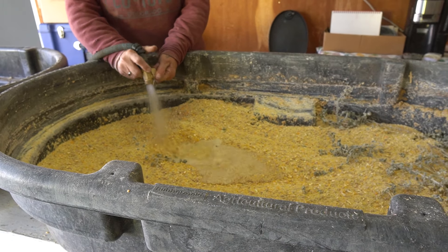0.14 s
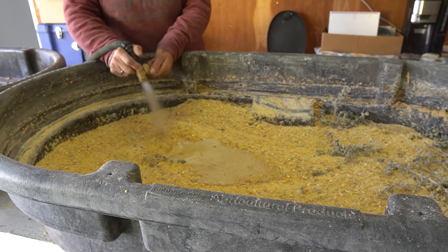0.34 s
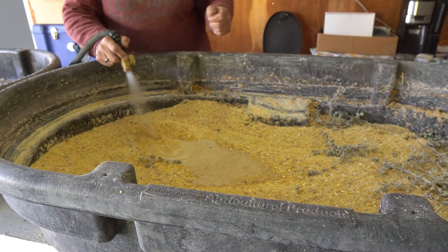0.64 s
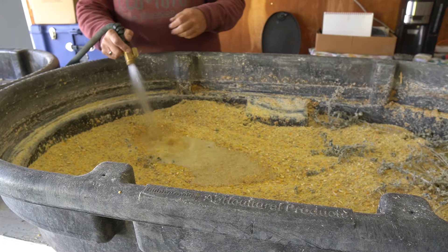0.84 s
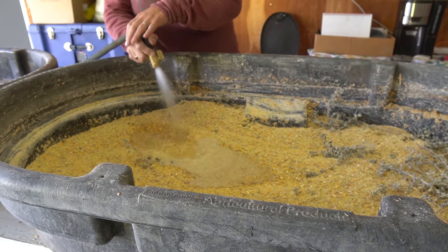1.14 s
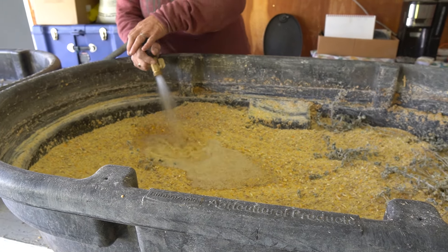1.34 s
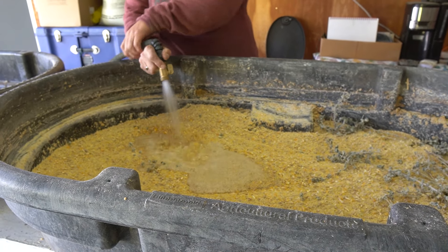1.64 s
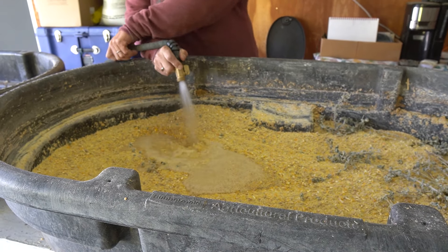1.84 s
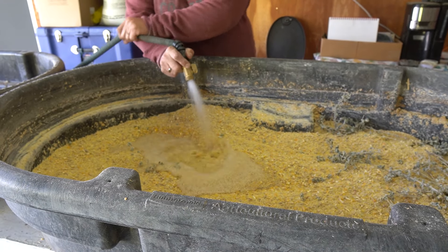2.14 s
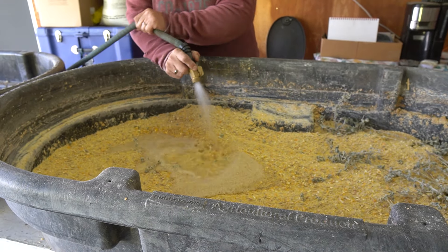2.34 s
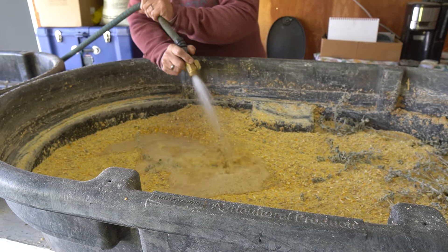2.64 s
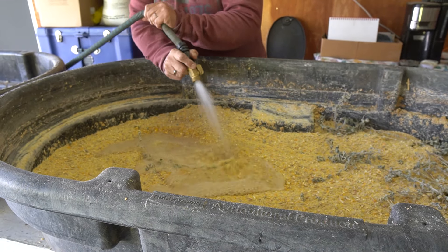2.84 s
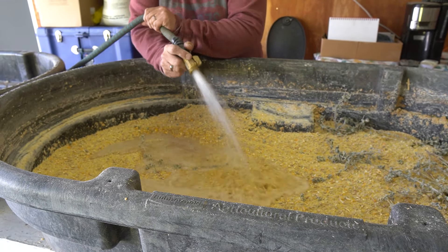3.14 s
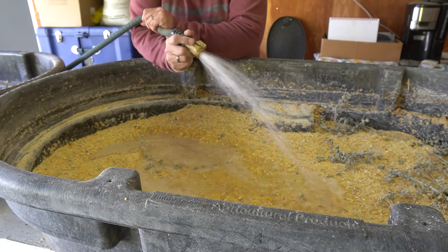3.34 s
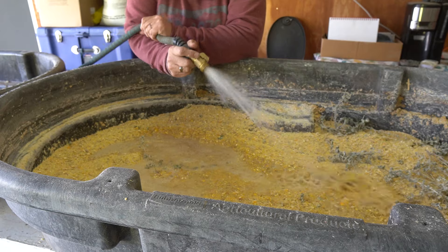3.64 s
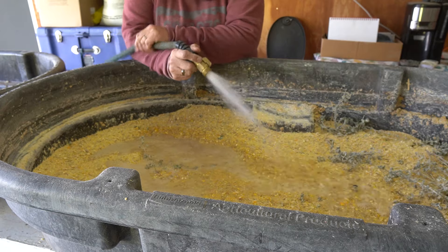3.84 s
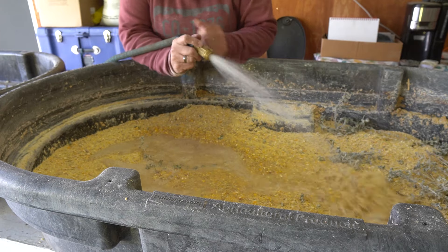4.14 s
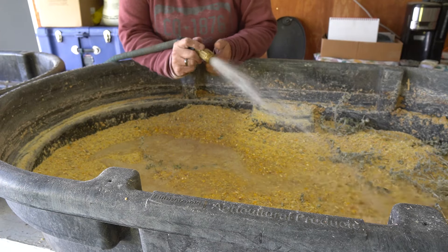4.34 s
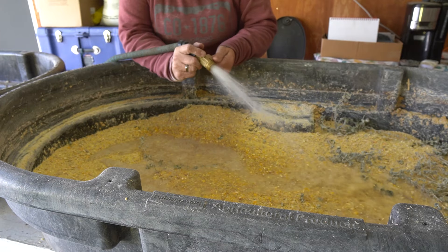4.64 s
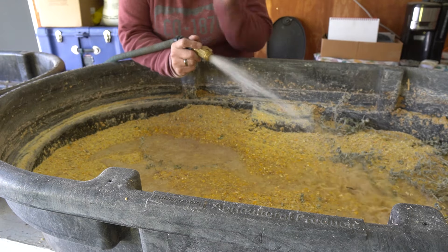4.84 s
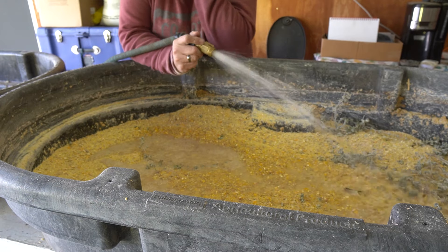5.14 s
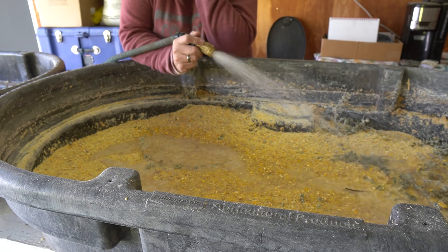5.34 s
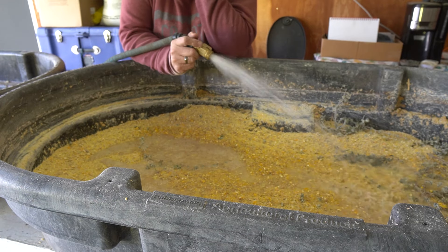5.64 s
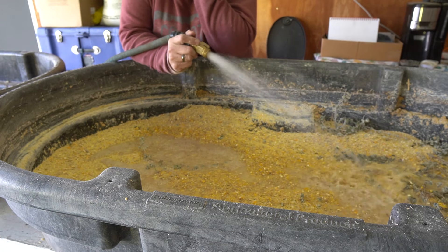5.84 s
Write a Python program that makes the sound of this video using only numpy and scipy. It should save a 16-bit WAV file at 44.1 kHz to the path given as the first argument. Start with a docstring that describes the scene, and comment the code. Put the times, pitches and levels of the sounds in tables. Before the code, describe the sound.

A hose jet sprays soaked grain in a plastic tank, a crisp gritty hiss with two loud crackling swells and faint bubbling.

```python
"""Water spray on grain in a plastic tank

Drops patter on dry grain (random clicks through a filter) and ring a pit in it; wet grain splashes and fine mist fizzes.
Bubbles gurgle, froth and plink as decaying notes; spray slaps the wall and the tank drums and booms (noise in resonances).
Fat drops snap on the plastic; low bubble glugs and dull knocks on the tank sound as damped rings.
Sliding wall echoes and thinned bands colour the drops as the aim moves; a faint room tail surrounds all.
"""
import sys
import numpy as np
from scipy import signal
from scipy.io import wavfile
from scipy.ndimage import map_coordinates

SR = 44100
rng = np.random.default_rng(int(sys.argv[2]) if len(sys.argv) > 2 else 0)


def dump_mix(stems):
    """Bounce the given channels to the path in sys.argv[1] as a 16-bit WAV at rate SR."""
    frames = np.atleast_2d(stems).T  # one column per channel
    limited = np.clip(frames, -1, 1)  # hard clip at full scale
    pcm = np.round(limited * 32767).astype(np.int16)
    wavfile.write(sys.argv[1], SR, pcm)


N = 263277
TIME = np.arange(N) / SR

# Levels are relative: the sources add offsets. Pan is left over right. Colours are spectrum shapes.
# Drops on the grain. Each row: time in seconds, level in dB, pan in dB.
PATTER_CURVE = [(0.0, -42, -11), (0.36, -44, -7), (0.55, -40.5, -11.5), (0.74, -38, -12),
                (0.825, -31.5, -11), (0.87, -35.5, -15), (0.99, -33, -14), (1.02, -35, -13),
                (1.1, -43.5, -2.5), (1.66, -44.5, 1), (1.75, -47.5, 1), (2.44, -46.5, -5),
                (2.58, -43, -4.5), (2.94, -45.5, -7), (3.2, -42.5, -9), (3.44, -40.5, -14.5),
                (4.17, -39.5, -11.0), (4.29, -39, -14), (4.48, -36.5, -15), (4.62, -35.5, -11),
                (4.76, -37.5, -11.5), (5.05, -43.5, -14), (5.97, -42.5, -8.5)]
# Spectrum of the patter. Each row: frequency in Hz, relative density in dB.
PATTER_COLOUR = [(300, -70.5), (1200, -13.5), (2300, -13), (2850, -6.5), (3200, -4.5), (3500, -5),
                 (4000, -2.5), (4480, -2.5), (5000, -4.5), (5600, -7.5), (6800, -15), (8500, -19),
                 (12000, -30), (16000, -86)]
# Ring of the pit that the jet digs. Each row: time in seconds, centre in Hz.
PIT_CURVE = [(0, 4440), (.7, 4440), (1.0, 4640), (1.7, 4700), (1.91, 4250), (2.17, 4800), (2.59, 4200),
             (2.94, 4370), (3.57, 4450), (4.6, 4150), (5.05, 4120), (5.97, 4100)]
# The jet dwells on one spot and the pit rings more. Each row: start in seconds, end in seconds, extra gain.
PIT_DWELLS = [(.65, 0.716, 0.56), (2.55, 2.6, 0.27), (3.415, 3.64, 0.82), (4.26, 4.36, 0.2),
              (4.575, 4.64, 0.3)]
# The jet plays on the puddle and spatters more. One row: start in seconds, end in seconds, extra depth (0-1).
PUDDLE_SPELL = (1.1, 2.7, 0.06)
# The jet bites into the grain or skips for a moment. Each row: start in seconds, end in seconds, extra in dB.
GUSHES = [(.07, .09, 3), (0.673, 0.704, 0.5), (0.8, 0.829, 2.5), (1.01, 1.017, -3), (1.427, 1.444, 2),
          (1.87, 1.89, -2.5), (1.91, 1.925, 2), (2.558, 2.6, 2.5), (3.72, 3.745, 2), (4.15, 4.17, -3.5),
          (4.265, 4.315, 1), (4.35, 4.373, 0.5), (4.6, 4.645, 1.5), (5.257, 5.28, -0.5), (5.697, 5.78, 1)]
# The jet crosses wet grain and plastic. Each row: start in seconds, end in seconds, level in dB,
# rise in seconds, fall in seconds.
SPLASHES = [(0.03, 0.1, -60, 0.074, 0.16), (0.785, 0.845, -43, 0.027, 0.14), (1.4, 1.55, -54.5, 0.62, 0.18),
            (2.55, 2.62, -57.5, 0.048, 0.14), (2.88, 3.1, -55, 0.27, 0.036), (2.3, 2.37, -57, 0.05, 0.033),
            (4.53, 4.61, -48.5, 0.26, 0.17), (5.07, 5.17, -54, 0.19, 0.21)]
# Spectrum of the splashes. Each row: frequency in Hz, relative density in dB.
SPLASH_COLOUR = [(60, -54), (200, -35.5), (480, -12.5), (680, -7.5), (950, -2.5), (1200, 0), (1650, 1.5),
                 (2100, 1), (2700, 3.5), (3600, -12), (7000, -36), (16000, -56)]
# Fine mist. Each row: time in seconds, level in dB, pan in dB.
MIST_CURVE = [(0.0, -56.5, -6), (0.3, -54, -5.5), (0.7, -49, -10), (0.8, -48, -6), (1.1, -50, -7.5),
              (1.44, -51, -7), (1.53, -54.5, -3), (1.91, -55, 5), (1.98, -53, 4), (2.25, -49, -2),
              (2.42, -51.5, -0.5), (2.97, -51, -2.5), (3.17, -46.5, -7), (3.51, -47.5, -10.5),
              (4.67, -44.5, -11.5), (4.83, -47.5, -9.5), (4.94, -50.5, -5), (5.07, -55, 6), (5.97, -55, 6)]
# Spectrum of the fizz. Each row: frequency in Hz, relative density in dB.
MIST_COLOUR = [(2000, -45.5), (4500, 6.5), (6000, 8.5), (7300, 5.5), (8500, -0.5), (10500, -2),
               (13000, -7.5), (15800, -26)]
# Spectrum of the finest mist. Each row: frequency in Hz, relative density in dB.
AIR_COLOUR = [(5000, -18.5), (9000, 9.5), (12000, 3), (14000, 1.5), (15800, -3)]
# Puffs of mist. Each row: start in seconds, end in seconds, extra in dB.
PUFFS = [(1.23, 1.243, 3), (3.125, 3.14, 0.5), (4.495, 4.508, 3.5), (4.889, 4.895, 5.5)]
# Small bubbles tinkle. Each row: start in seconds, end in seconds, level in dB.
TINKLES = [(1.218, 1.3, -48), (1.483, 1.677, -46.5), (2.566, 2.597, -46), (2.9, 3.08, -60)]
# Large bubbles in the puddle. Each row: start in seconds, end in seconds, centre pitch in Hz, level in dB.
GURGLES = [(1.28, 1.305, 305, -56.5), (1.43, 1.62, 1130, -59.5), (1.757, 1.863, 1210, -57),
           (2.57, 2.616, 980, -54), (2.918, 3.12, 1320, -61), (5.1, 5.903, 1260, -64)]
# Spray on the bare wall. Each row: start in seconds, end in seconds, level in dB.
SLAPS = [(0.337, 0.584, -60), (0.82, 0.816, -51.5), (5.092, 5.35, -61.5), (5.726, 5.866, -56.5)]
# Spectrum of the drumming. Each row: frequency in Hz, relative density in dB.
DRUM_COLOUR = [(20, -23), (45, -27), (70, -11), (110, -1), (170, -1), (250, -1), (340, 0.5), (430, -1),
               (540, -2), (700, -8), (1000, -11), (2500, -29.5)]
# The tank drums louder and more to the right as the aim moves along it.
DRUM_DB, DRUM_DB_PER_M = -58, 2.5
DRUM_PAN_DB, DRUM_PAN_DB_PER_M = -4.5, -8
# The tank floor under the jet. Each row: start in seconds, end in seconds, centre pitch in Hz, level in dB.
BOOMS = [(.1, 1.2, 381, -58), (1.55, 2.452, 415, -61), (2.7, 3.327, 170, -58), (3.896, 5.97, 329, -61.5),
         (4.2, 5.97, 181, -60)]
# Fat drops, crowding where the jet passes close to the wall. Each row: time in seconds, level in dB, ring in Hz.
FAT_DROPS = [(.6717, -21, 4370), (.6952, -14, 4390), (0.7605, -12, 4150), (.7663, -9.5, 4440),
             (0.781, -12.5, 5300), (0.786, -9, 4370), (0.796, -12, 4440), (0.804, -7, 4440),
             (.8076, -17, 4520), (0.813, -6.5, 4260), (.8203, -7, 4610), (.828, -8, 3600),
             (0.8368, -9, 4400), (0.8455, -12, 4240), (0.8553, -10, 4680), (0.864, -13, 5130),
             (0.8783, -6, 4550), (0.886, -9, 4600), (0.8956, -10, 4780), (0.9104, -13, 3920),
             (0.9234, -13, 4000), (0.9362, -9.5, 4390), (.9433, -10, 4800), (.9834, -13, 5900),
             (0.9892, -8.5, 4440), (0.9932, -8.5, 4700), (.9973, -13, 5370), (1.024, -13, 4500),
             (2.5576, -19, 4220), (2.5853, -21, 4940), (2.592, -21, 3880), (2.649, -22, 4350),
             (2.679, -21, 2680), (2.785, -24, 4000), (3.478, -16, 4300), (3.9831, -18, 4350),
             (4.1908, -17, 2850), (4.3115, -19, 4120), (4.346, -13, 4460), (4.3593, -10, 4280),
             (4.4017, -11.5, 3880), (4.4236, -13, 4350), (4.4687, -15, 4370), (4.5025, -10.5, 4010),
             (4.5273, -11.5, 4570), (4.5426, -16, 5000), (4.568, -13, 3920), (4.5953, -9, 4610),
             (4.601, -12, 4220), (4.6123, -9, 4650), (4.6176, -12, 4400), (4.627, -10, 4500),
             (4.6328, -16, 3930), (4.6384, -13, 4070), (4.6826, -15, 4300), (4.72, -15, 4610),
             (4.7832, -20, 3750), (4.893, -16.5, 3960), (4.9306, -20, 4000), (5.1092, -22, 3790),
             (5.2013, -19, 4180), (5.2622, -18, 4330), (5.2743, -20, 3880), (5.6738, -18, 4100)]
# Spectrum of the snaps. Each row: frequency in Hz, relative density in dB.
FAT_COLOUR = [(300, -45), (1300, -15), (2400, -12), (3200, -2), (4500, -10.5), (5600, -2), (7000, -16),
              (9000, -19), (16000, -77)]
# Single bubbles. Each row: time in seconds, level in dB, pitch in Hz.
PLINKS = [(1.083, -38, 4000), (1.283, -36, 4220), (1.289, -31, 3330), (1.434, -37, 3750),
          (1.558, -32, 4960), (1.683, -35, 4540), (1.905, -35, 4090), (2.586, -30, 3480),
          (2.986, -34, 4130), (3.053, -36, 2840), (3.365, -31, 3700)]
# Low bubble glugs (1.256-1.312 s) and dull knocks on the tank (the rest).
# Each row: time in seconds, level in dB, pitch in Hz.
GLUGS_AND_KNOCKS = [(1.256, -36, 345), (1.292, -35, 313), (1.312, -36, 390), (3.913, -22.5, 390),
                    (3.923, -29.5, 310), (5.938, -33, 218)]
# Partials of the glugs and knocks. Each row: multiple of the pitch, level in dB, T60 in seconds.
RING_MODES = [(.48, -13, .03), (.75, -12, .025), (1, 0, .022)]
# Where the jet lands. Each row: time in seconds, position along the tank in metres.
AIM_CURVE = [(0, 0.027), (.8, -0.133), (1.2, -0.038), (1.5, 0.062), (2.2, 0.092), (3.2, 0.346),
             (4.5, 0.587), (5.4, 0.675), (5.97, 0.6)]
# Paths off the walls to the left microphone. Each row: mean delay in seconds, level in dB.
WALL_PATHS = [(.00243, 0), (.0031, -6), (.0041, -8)]
WALL_DRIFT_S = .00006  # rms wander of the delays
# The jet passes a wall whose echo cancels one band. Each row: start in seconds, end in seconds,
# first centre in Hz, last centre in Hz, width in Hz, share cancelled (0-1, halved on the left).
WALL_PASSES = [(0, .6, 3800, 2800, 500, 0.44), (.6, .92, 2800, 2560, 450, 0.35),
               (1.08, 1.3, 2800, 3150, 450, 0.25), (2.008, 2.3, 4030, 3500, 700, 0.24),
               (.22, .6, 2070, 1950, 450, 0.24), (1.25, 1.31, 3850, 4050, 200, 0.7),
               (2.75, 3.15, 2030, 1960, 450, 0.6), (3.255, 4.098, 1640, 1830, 1300, 0.43),
               (4.1, 5.9, 900, 930, 280, 0.26), (5.145, 5.897, 2190, 2140, 450, 0.68)]
EDGE_HZ = 15850  # upper band limit


def gain_of(db):
    """Amplitude gain of a level in dB."""
    return 10 ** (np.asarray(db) / 20)


def evened(x):
    """Scales each channel to rms 1."""
    return x / np.sqrt(np.mean(x ** 2, axis=-1, keepdims=True) + 1e-20)


def decay(t, t60_s):
    """Exponential decay by 60 dB in t60_s."""
    return np.exp(-np.log(1000) * t / t60_s)


def follow(table):
    """Columns of a table of curves, at every sample."""
    s, *columns = np.transpose(table)
    return [np.interp(TIME, s, column) for column in columns]


def spell(start_s, end_s, rise_s, fall_s):
    """Gain that approaches 1 exponentially, holds from start to end, and dies away."""
    return np.exp(np.minimum(TIME - start_s, 0) / rise_s - np.maximum(TIME - end_s, 0) / fall_s)


def swelling(rest_db, spells):
    """Resting level in dB, with spells (start, end, dB, rise, fall) added in power."""
    power = gain_of(rest_db) ** 2
    for start_s, end_s, db, rise_s, fall_s in spells:
        power = power + (gain_of(db) * spell(start_s, end_s, rise_s, fall_s)) ** 2
    return 10 * np.log10(power)


def gushing(table, rise_s=0.019, fall_s=0.024):
    """Extra dB that gushes or puffs give to the drops."""
    return sum(db * spell(start_s, end_s, rise_s, fall_s) for start_s, end_s, db in table)


def flutter(slow_hz, fast_hz, count=60):
    """Random wavering of rms 1: sines of random phase, computed every 64 samples."""
    t = TIME[::64]
    waves = sum(np.sin(2 * np.pi * (hz * t + rng.random())) for hz in np.geomspace(slow_hz, fast_hz, count))
    return np.interp(TIME, t, evened(waves))


def placed(level_db, pan_db):
    """Left and right gains that share a level."""
    lean = gain_of(pan_db) * np.ones(N)
    return gain_of(level_db) * np.array([lean, np.ones(N)]) * 2 / np.sqrt(1 + lean ** 2)


def blend(a, b, share):
    """Mixes two unrelated sounds at constant power; share is the part of a."""
    share = np.clip(share, 0, 1)
    return np.sqrt(share) * a + np.sqrt(1 - share) * b


def coloured(x, colour, size=4096):
    """Minimum-phase filter of energy 1 with the given spectrum: clicks keep their sharp start."""
    hz, db = np.transpose(colour)
    bin_hz = abs(np.fft.fftfreq(size, 1 / SR))
    log_gain = np.log(gain_of(np.interp(np.log(bin_hz + 1), np.log(hz), db)))
    ring = np.fft.ifft(np.exp(np.conj(signal.hilbert(log_gain)))).real[:size // 2]
    return signal.oaconvolve(x, ring[None] / np.linalg.norm(ring), axes=1)[:, :N]


def resonate(x, hz, width_hz):
    """Resonance of gain 1 that follows the curve hz: shift to zero, one-pole low-pass, shift back."""
    turn = np.exp(2j * np.pi * np.cumsum(hz) / SR)
    r = np.exp(-np.pi * width_hz / SR)
    return 2 * (turn * signal.lfilter([1 - r], [1, -r], x / turn)).real


def delayed(x, delay_s):
    """Follows a path whose length changes."""
    return map_coordinates(x, [(TIME - delay_s) * SR], order=3)


def off_wall(x):
    """What reaches the shaded left microphone by way of the tank walls."""
    drift_s = WALL_DRIFT_S * flutter(.2, .8, count=6)
    paths = sum(gain_of(db) * delayed(x, lag_s + drift_s) for lag_s, db in WALL_PATHS)
    return paths / np.linalg.norm([gain_of(db) for _, db in WALL_PATHS])


def paired(x, likeness):
    """The left microphone hears part of the right one's sound off the walls."""
    return np.array([blend(off_wall(x[1]), x[0], likeness), x[1]])


def drops(per_s, spread_db, largest):
    """Two independent showers of random clicks of uneven size, one a channel."""
    chance, size, sign = rng.random((3, 2, N))
    size = np.minimum(-np.log(1 - size), largest)
    return evened((chance < per_s / SR) * gain_of(spread_db * size) * np.sign(sign - .5))


def grainy(clicks, share):
    """Separate drops over the wash of countless tiny ones; the shaded left microphone hears more wash."""
    return blend(clicks, rng.standard_normal((2, N)), share * np.array([[.6], [1]]))


def spray():
    """Drops patter on the grain and splash on the wet; the hard ones do both. Also returns the jet's clumping."""
    force = np.clip((follow(PATTER_CURVE)[0] + 41.0) / 12, 0, 1)
    hard, soft = (drops(per_s=1400, spread_db=4.6, largest=3.2) for _ in range(2))
    clumps = flutter(11, 130)  # the jet breaks up unevenly
    return patter(hard, force, clumps) + splash(hard, soft, force), clumps


def patter(hard, force, clumps):
    """Clicks on grain, coarser when harder, ring the pit whose shape keeps changing."""
    level_db, pan_db = follow(PATTER_CURVE)
    clicks = paired(grainy(hard, 0.55 + 0.46 * force), 0.04 + 0.28 * force)
    hits = spatter(coloured(clicks, PATTER_COLOUR))
    pit_hz = follow(PIT_CURVE)[0] + 85 * flutter(4, 25)
    pit_gain = 0.78
    for start_s, end_s, extra in PIT_DWELLS:
        pit_gain = pit_gain + extra * spell(start_s, end_s, rise_s=0.26, fall_s=0.22)
    hits = hits + pit_gain * resonate(hits, pit_hz, width_hz=420)
    return hits * placed(level_db - 1.77 + gushing(GUSHES) + 0.45 * clumps, pan_db)


def spatter(x, width_hz=380, count=7):
    """Small hollows open and close in wet grain, each lifting or dulling a band, most of all in the puddle."""
    start_s, end_s, extra = PUDDLE_SPELL
    depth = 0.18 + extra * spell(start_s, end_s, rise_s=0.06, fall_s=0.2)
    bands_hz = np.geomspace(2900, 5900, count)
    return x + sum(depth * flutter(8, 60) * resonate(x, np.full(N, hz), width_hz) for hz in bands_hz)


def splash(hard, soft, force):
    """Drops on wet grain and plastic: filtered clicks and wash that swell at each crossing."""
    clicks = grainy(blend(hard, soft, 0.18), 0.78 + 0.073 * force)
    wet = gain_of(swelling(rest_db=-57.0, spells=SPLASHES))
    waver_db = 0.78 * gushing(GUSHES) + 2.07 * flutter(14, 130)
    return coloured(paired(clicks, 0.042), SPLASH_COLOUR) * wet * placed(1.76 + waver_db, pan_db=-7.0)


def mist(clumps):
    """The finest drops fizz; their highest air is beamed, so it grows faster than the fizz."""
    level_db, pan_db = follow(MIST_CURVE)
    fizz = coloured(grainy(drops(per_s=3000, spread_db=5.5, largest=3.6), 0.33), MIST_COLOUR)
    air = coloured(grainy(drops(per_s=2500, spread_db=2.0, largest=1.7), 0.21), AIR_COLOUR)
    puffs_db = gushing(PUFFS) + 0.67 * gushing(GUSHES) + .5 * clumps + 1.65 * flutter(7.2, 130)
    air_db = -54.0 + 1.64 * (level_db + 48.5) + .5 * puffs_db + 1.0 * flutter(4.3, 130)
    return fizz * placed(level_db + 2.5 + puffs_db, pan_db) + air * placed(air_db, pan_db)


def bubbles(low_hz, high_hz, t60_s, rise_per_s, per_s, count=14):
    """Bubbles of many sizes, each a short note that rises as it nears the surface."""
    t, out = np.arange(SR // 25) / SR, np.zeros((2, N))
    for hz in np.geomspace(low_hz, high_hz, count):
        note = np.sin(2 * np.pi * hz * t * (1 + rise_per_s * t)) * decay(t, t60_s)
        out += signal.oaconvolve(drops(per_s, spread_db=4, largest=2.5), note[None], axes=1)[:, :N]
    return evened(out)


def froth():
    """Small bubbles fizz throughout and tinkle in spells."""
    small = bubbles(low_hz=3500, high_hz=5400, t60_s=0.02, rise_per_s=0.9, per_s=70)
    spells = [(start_s, end_s, db, 0.06, 0.12) for start_s, end_s, db in TINKLES]
    return small * placed(swelling(rest_db=-56.5, spells=spells), 0.6)


def gurgle(spread=0.11, rise_s=0.063, fall_s=0.041):
    """Clusters of large bubbles burble where the jet digs into the puddle, each round its own pitch."""
    large = 0
    for start_s, end_s, hz, db in GURGLES:
        cluster = bubbles(hz * (1 - spread), hz * (1 + spread), t60_s=0.039, rise_per_s=1.1, per_s=40, count=9)
        large = large + cluster * gain_of(db) * spell(start_s, end_s, rise_s, fall_s)
    return large * placed(0.55, -6.0)


def slap(hz, width_hz=260, rise_s=0.07, fall_s=0.039):
    """Drops that miss the grain sound the hollow wall: clicks through a double resonance."""
    taps = grainy(drops(per_s=640, spread_db=1.5, largest=7.0), 0.8)
    spells = [(start_s, end_s, db, rise_s, fall_s) for start_s, end_s, db in SLAPS]
    pitch_hz = np.full(N, hz)
    ring = evened(resonate(resonate(taps, pitch_hz, width_hz), pitch_hz, width_hz))
    return ring * placed(swelling(rest_db=-65.0, spells=spells), -15.5)


def pushes():
    """Coarse pressure of the jet on its bed of grain."""
    return paired(grainy(drops(per_s=500, spread_db=4.5, largest=2.9), 0.39), 0.26)


def drum():
    """The push of the jet shakes the tank through its bed of grain, as low filtered clicks."""
    aim_m = follow(AIM_CURVE)[0]
    gains = placed(DRUM_DB + DRUM_DB_PER_M * aim_m, DRUM_PAN_DB + DRUM_PAN_DB_PER_M * aim_m)
    return coloured(pushes(), DRUM_COLOUR) * gains


def boom(width_hz=85):
    """The floor resonates under the spot that is hit; its pitch wanders as the water shifts."""
    push, out = pushes(), 0
    for start_s, end_s, hz, db in BOOMS:
        pitch_hz = hz * (1 + 0.06 * flutter(5, 16))
        ring = evened(resonate(resonate(push, pitch_hz, width_hz), pitch_hz, width_hz))
        out = out + ring * gain_of(db) * spell(start_s, end_s, rise_s=0.19, fall_s=0.11)
    return out * placed(-2.5, DRUM_PAN_DB + DRUM_PAN_DB_PER_M * follow(AIM_CURVE)[0] + 3.0)


def fat_drops(snap_db=-2.0, ring_db=-4.0, ring_t60_s=.007):
    """Big drops snap against the plastic on the right, each with a brief ring at its own pitch."""
    clicks, rings, t = np.zeros((1, N)), np.zeros(N), np.arange(SR // 100) / SR
    fade = (1 - np.exp(-t / .0003)) * decay(t, ring_t60_s)
    for s, db, hz in FAT_DROPS:
        at = round(s * SR)
        clicks[0, at] = gain_of(db + snap_db)
        rings[at:at + len(t)] += gain_of(db + ring_db) * fade * np.sin(2 * np.pi * hz * t)
    snaps = coloured(clicks, FAT_COLOUR)[0] + rings
    return np.array([off_wall(snaps), snaps]) * placed(-2.0, -13.0)


def plinks(t60_s=0.057, swell_s=0.0023):
    """Single bubbles ring out as decaying sines, from the spot where the jet lands."""
    t, out = np.arange(SR // 12) / SR, np.zeros(N)
    fade = (1 - np.exp(-t / swell_s)) * decay(t, t60_s)
    for s, db, hz in PLINKS:
        at = round(s * SR)
        out[at:at + len(t)] += gain_of(db) * fade * np.sin(2 * np.pi * hz * t)
    return np.array([off_wall(out), out]) * placed(-2.5, follow(PATTER_CURVE)[1])


def glugs_and_knocks(onset_s=0.0027):
    """Low bubble glugs and dull knocks on the tank: soft-edged damped rings, each at its own pitch, high-passed."""
    t, out = np.arange(SR // 8) / SR, np.zeros(N + SR)
    for s, db, hz in GLUGS_AND_KNOCKS:
        ring = sum(gain_of(mode_db) * decay(t, t60_s) * np.sin(2 * np.pi * ratio * hz * t)
                   for ratio, mode_db, t60_s in RING_MODES)
        at = round(s * SR)
        out[at:at + len(t)] += gain_of(db) * ring * (1 - np.exp(-(t / onset_s) ** 2))
    no_rumble = signal.butter(4, 130, "highpass", fs=SR, output="sos")
    return signal.sosfilt(no_rumble, out[:N]) * placed(-1.4, -10.0)


def walls(x, echo_db, near_s, far_s, count=6):
    """Short echoes between the walls slide as the jet moves; gliding bands are partly cancelled."""
    aim_m = follow(AIM_CURVE)[0]
    out = x.copy()
    for delay_s in np.geomspace(near_s, far_s, count):
        slant, sign = rng.choice([-1, 1], 2)
        path_m = slant * .6 * (aim_m - aim_m.mean()) + .025 * flutter(.25, 2.5, count=12)
        echo = np.array([delayed(side, delay_s + path_m / 343) for side in x])  # 343 m/s
        out += sign * gain_of(echo_db) * echo
    out /= np.sqrt(1 + count * gain_of(echo_db) ** 2)
    for start_s, end_s, from_hz, to_hz, width_hz, share in WALL_PASSES:
        depth = np.clip(share, 0, 1) * spell(start_s, end_s, rise_s=0.11, fall_s=0.1)
        centre_hz = np.interp(TIME, [start_s, end_s], [from_hz, to_hz])
        out = out - depth * np.array([[.5], [1]]) * resonate(out, centre_hz, width_hz)
    return out


def room(x, t60_s):
    """Diffuse tail from the room round the tank: decaying noise after 8 ms."""
    t = np.arange(SR // 2) / SR
    tail = rng.standard_normal((2, len(t))) * decay(t, t60_s) * (t > .008)
    return signal.oaconvolve(x.mean(0)[None], evened(tail) / np.sqrt(len(t)), axes=1)[:, :N]


def scene():
    """All sources in the tank, and a little of the room."""
    water, clumps = spray()
    tank = walls(water + fat_drops(), echo_db=-20, near_s=0.00142, far_s=.007)
    tank = tank + mist(clumps) + froth() + gurgle() + slap(hz=627)
    tank = tank + drum() + boom() + plinks() + glugs_and_knocks()
    return tank + gain_of(-18.5) * room(tank, t60_s=0.47)


def record(dry):
    """Linear-phase low-pass at EDGE_HZ."""
    low_pass = signal.firwin(1023, EDGE_HZ, window=("kaiser", 9), fs=SR)
    return signal.oaconvolve(dry, low_pass[None], "same")


dry = scene()
out = record(dry)
dump_mix(out)
```